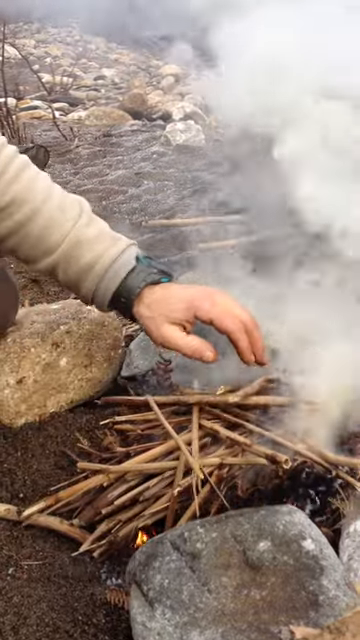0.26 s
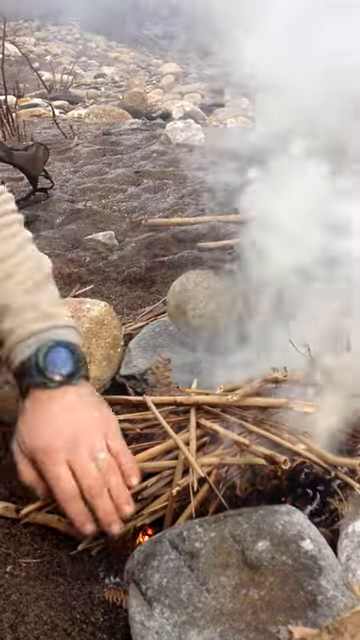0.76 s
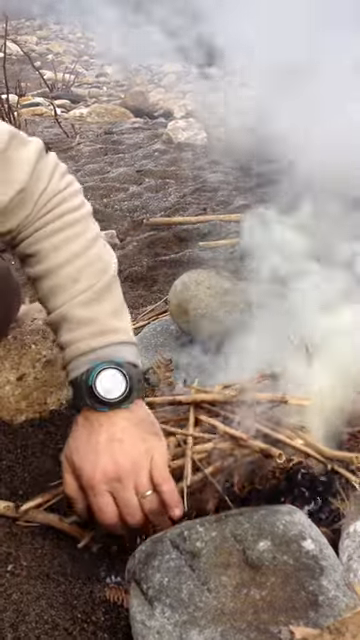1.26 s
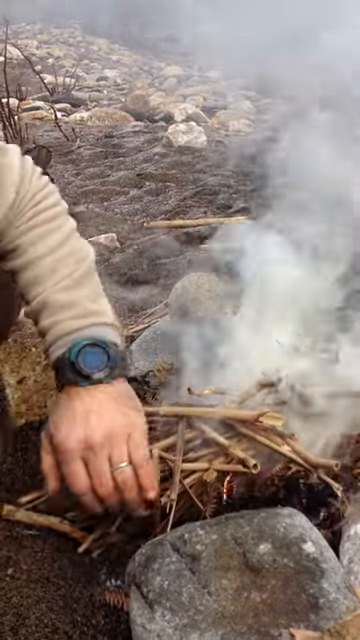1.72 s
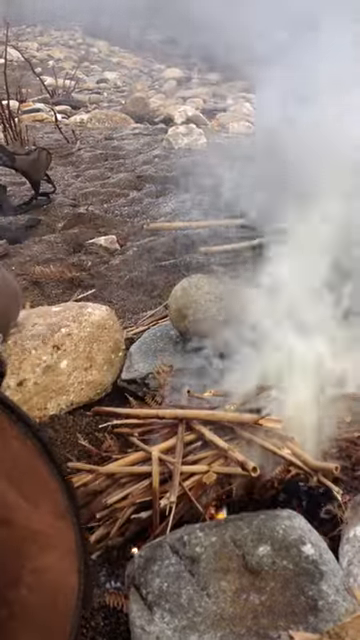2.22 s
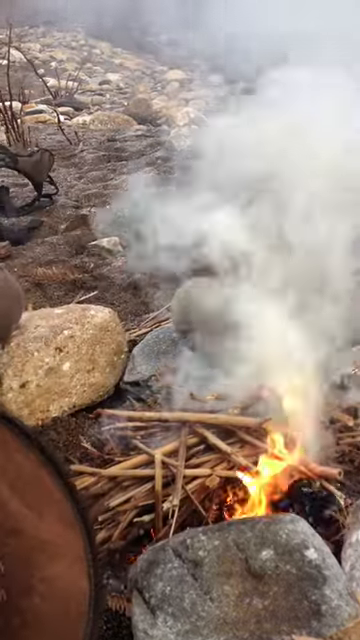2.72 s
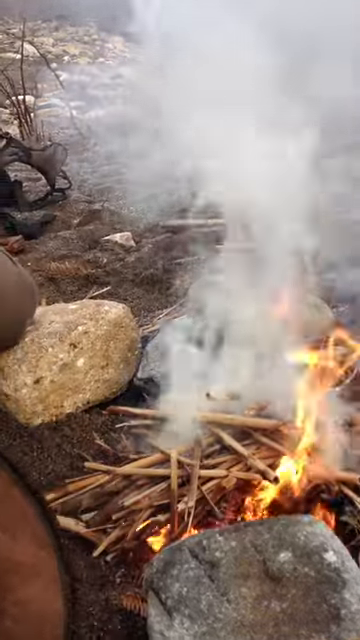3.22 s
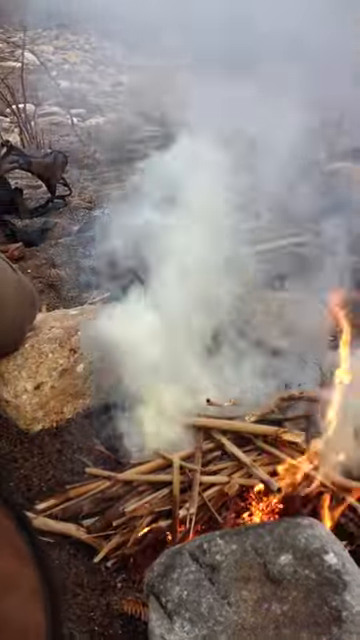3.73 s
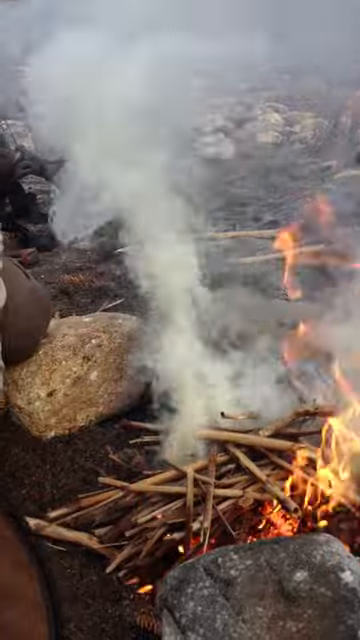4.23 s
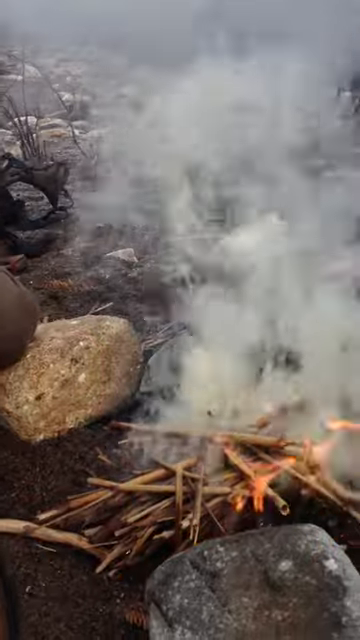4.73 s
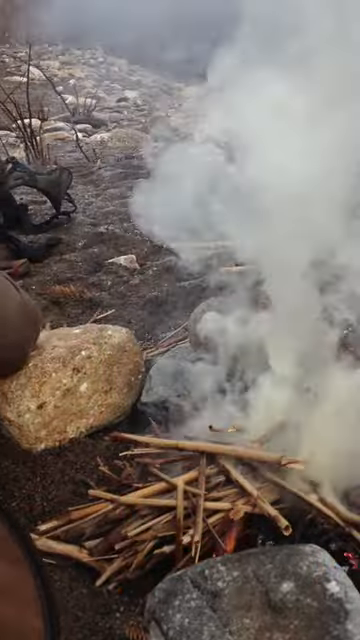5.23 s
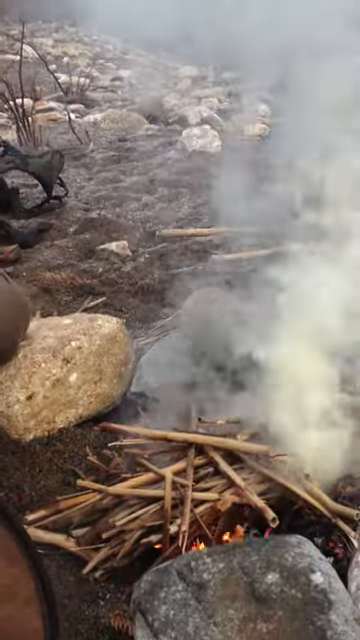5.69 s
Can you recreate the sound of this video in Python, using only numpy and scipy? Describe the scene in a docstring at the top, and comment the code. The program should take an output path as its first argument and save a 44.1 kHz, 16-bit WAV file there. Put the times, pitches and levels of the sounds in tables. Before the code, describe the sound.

Thin stems tick, fizz and snap close to the microphone while a river rushes softly behind. A violent crack bursts out early and the level ducks slightly, then recovers. Midway the fire catches, with puffing low flutter, thick crackles, another hard pop and sizzling steam. It dies back abruptly to light ticking, a splintery burst near five seconds and a last cluster of small cracks. Open air, only faint scatter from stones.

```python
"""Small stem fire on a river bank

Damp plant stems hiss and fizz (filtered clicks), fibres snap (single sharp breaks with splintering tails)
and a few hollow stems burst and ring (cracks plus decaying modes). A flame flutters softly (low filtered
noise) and flares up half-way through. Behind it a river rushes steadily (noise, bubbles, fine drops).
The stones add a faint scatter. Loud pops make the recorder's gain duck, and it creeps back afterwards."""
import sys
import numpy as np
from scipy import signal
from scipy.fft import rfft, irfft, next_fast_len
from scipy.io import wavfile

SR = 44100
rng = np.random.default_rng(int(sys.argv[2]) if len(sys.argv) > 2 else 0)


def wav_out(sig):
    """Save sig, one row per channel (or a flat mono array), as 16-bit PCM at SR to the path in sys.argv[1]."""
    wavfile.write(sys.argv[1], SR, np.round(np.clip(np.atleast_2d(sig).T, -1, 1) * 32767).astype(np.int16))


N = 262611
TIME = np.arange(N) / SR
SHORT = TIME[:2048]  # time axis of one brief sound


def undb(db):
    """Decibels to gain."""
    return 10 ** (np.asarray(db) / 20)


def curve(table):
    """A (time, level) table joined by straight lines in time."""
    times, levels = np.transpose(table)
    return np.interp(TIME, times, levels)


def unit(x):
    """Scale to rms 1."""
    return x / np.sqrt(np.mean(x ** 2))


def colour(x, points):
    """Causal minimum-phase filter through (Hz, dB) points, joined along log frequency."""
    hz, db = np.transpose(points)
    size = 2 * next_fast_len(len(x) // 2 + 1)
    bins = np.maximum(np.arange(size // 2 + 1) * SR / size, 1)
    gain_db = np.interp(np.log(bins), np.log(hz), db)
    cepstrum = irfft(np.log(undb(gain_db)))
    # folding the cepstrum forward in time makes the filter causal
    cepstrum[1:size // 2] *= 2
    cepstrum[size // 2 + 1:] = 0
    response = np.exp(rfft(cepstrum))
    return irfft(rfft(x, size) * response)[:len(x)]


def no_bass(x, hz):
    """Steep high-pass: so small a source radiates no deep bass."""
    return signal.sosfilt(signal.butter(4, hz, "highpass", fs=SR, output="sos"), x)


def walk(rate):
    """Random wander with a spread near 1, drawn at rate points a second and joined by lines."""
    return 1.2 * np.interp(TIME * rate, np.arange(2048), rng.standard_normal(2048))


def add(out, s, sound):
    """Mix a sound in at a time in seconds."""
    start = int(s * SR)
    out[start:start + len(sound)] += sound[:N - start]


def decay(t60):
    """Exponential fall that loses 60 dB in t60 seconds."""
    return np.exp(-np.log(1000) * SHORT / t60)


def ring(hz, t60):
    """A struck mode; the pressure jumps at the blow and swings away."""
    return np.cos(2 * np.pi * hz * SHORT) * decay(t60)


def fracture(tail_share, tail_t60):
    """One sharp break, then a brief splintering; the two share an energy near 1."""
    share = np.clip(tail_share, 0, 1)
    tail = rng.standard_normal(len(SHORT)) * decay(tail_t60)
    pulse = np.sqrt(share) * tail / np.linalg.norm(tail)
    pulse[0] = np.sqrt(1 - share)
    return pulse


def grains(per_s, spread_db):
    """Random tiny clicks of either sign, many weak and few strong."""
    chance, size, sign = rng.random((3, N))
    strength = np.minimum(-np.log(1 - size), np.pi)
    happens = chance < per_s / SR
    return happens * undb(spread_db * strength) * np.sign(sign - .5)


def pores(clicks, low_hz, high_hz, t60):
    """Each click rings a pore of its own size, so every tick has its own pitch."""
    out = np.zeros(N)
    for at in np.flatnonzero(clicks):
        hz = low_hz * (high_hz / low_hz) ** rng.random()
        tick = ring(hz, t60)
        add(out, at / SR, clicks[at] * tick / np.linalg.norm(tick))
    return out


def bubbles(count, low_hz, high_hz, cycles, spread_db):
    """Air folded into running water rings briefly; small bubbles are quieter; rms 1."""
    out = np.zeros(N)
    for when, size, strength in rng.random((count, 3)):
        hz = low_hz * (high_hz / low_hz) ** size
        level = undb(spread_db * strength) * np.sqrt(low_hz / hz)
        add(out, when * N / SR, level * ring(hz, cycles / hz))
    return unit(no_bass(out, 400))


def river():
    """Water over stones: a low rush that wavers, bubbling, and finer splashing above it."""
    # tone of the low rush: (frequency [Hz], gain [dB])
    rush_tone = [(18, -51.5), (30, -48), (86, -22.5), (106, -15.5), (137, -4.5), (187, 0), (266, -2),
                 (303, -3), (365, -4), (393, -3), (423, -4), (636, -2.5), (871, -8), (1190, -7),
                 (2500, -15), (3250, -27.5), (5500, -120)]
    # tone of the splashing drops: (frequency [Hz], gain [dB])
    splash_tone = [(1400, -11.5), (2300, 3), (3000, 3.5), (3800, 0), (4550, 1.5), (5000, -7), (7500, -5.5),
                   (9700, -20), (15000, -13.5)]
    # drift of the splashing treble: (time [s], level [dB])
    splash_level = [(0, -59.5), (1.5, -58.5), (2.2, -60), (4.55, -61.5), (4.9, -57.5), (5.03, -62.5),
                    (5.22, -64), (5.31, -59), (5.95, -59)]
    rush = unit(colour(rng.standard_normal(N), rush_tone)) * undb(0.83 * walk(rate=18))
    babble = bubbles(count=2200, low_hz=531.2, high_hz=3640, cycles=8.85, spread_db=20)
    drops = unit(grains(per_s=7000, spread_db=0.5))
    splash = unit(colour(drops, splash_tone)) * undb(0.86 * walk(rate=29))
    return rush * undb(-51) + babble * undb(-61.5) + splash * undb(curve(splash_level))


def flame():
    """Burning gas flutters in the draught: faint over the embers, strong in each flare."""
    # tone of the flutter: (frequency [Hz], gain [dB])
    flutter_tone = [(25, -35), (60, -32), (100, -12.5), (150, -1.5), (200, 1), (290, -4.5), (400, -12),
                    (700, -31), (1500, -42.5)]
    # height of the flame, which catches, flares and collapses: (time [s], flutter level before wavering [dB])
    flame_level = [(0, -71), (2.36, -67), (2.54, -52), (2.62, -60.5), (2.75, -52.5), (2.92, -51.5),
                   (3.0, -47), (3.13, -47.5), (3.21, -47), (3.44, -49), (3.53, -53), (3.71, -53.5),
                   (3.79, -47), (4.03, -52), (4.13, -49.5), (4.31, -47.5), (4.39, -68.5), (5.95, -60)]
    roar = unit(colour(rng.standard_normal(N), flutter_tone))
    return roar * undb(curve(flame_level) + 1.68 * walk(rate=42))


def swell(start, attack_s, end, release_s):
    """An even rise, a hold until the end, then a dying away."""
    rise = np.clip((TIME - start) / attack_s, 0, 1)
    return rise * np.exp(-np.maximum(TIME - end, 0) / release_s)


def boiling():
    """Flow of steam: a slow boil with short spurts on top."""
    # how hard the sap boils, rising as the flame takes hold: (time [s], relative level [dB])
    boil_level = [(0, -71.5), (1.0, -68.5), (1.35, -66), (1.6, -62), (2.0, -68.5), (2.62, -71.5),
                  (2.9, -67), (3.05, -60.5), (3.5, -55), (3.85, -58.5), (4.38, -58), (4.6, -64),
                  (5.1, -65.5), (5.95, -71)]
    # spurts of steam: (start [s], length [s], relative level [dB])
    spurt_list = [(1.13, 0.078, -64.5), (1.379, 0.1, -62.5), (3.275, 0.035, -60), (5.27, 0.061, -57.5)]
    attack_s, release_s = 0.0143, 0.033
    spurts = np.zeros(N)
    for start, length, db in spurt_list:
        spurts += undb(db) * swell(start, attack_s, start + length, release_s)
    return np.hypot(undb(curve(boil_level)), spurts)


def steam(boil):
    """Sap boils out of the stems: a sputtering hiss, ticks that quicken with it, and a bright sizzle."""
    # tone of the escaping steam: (frequency [Hz], gain [dB])
    hiss_tone = [(2000, -22), (4300, -2), (5000, -9.5), (6300, -5), (7900, -2), (9000, -5), (9900, -10),
                 (12000, -7.5), (15000, -15.5)]
    # tone of the fine sizzle where the flame licks the damp stems: (frequency [Hz], gain [dB])
    sizzle_tone = [(3000, -29), (6000, -15), (8000, -5), (10000, -14), (12000, -12), (15000, -4.5)]
    jet = unit(colour(grains(per_s=4500, spread_db=4.0), hiss_tone)) * undb(2.7 * walk(rate=45))
    tick_rate = 90 * (boil / boil.mean()) ** .5
    ticks = colour(grains(per_s=tick_rate, spread_db=4.5), hiss_tone)
    heat = boil / boil.max()
    # blisters are both rarer and weaker away from the height of the boil
    blisters = grains(per_s=420 * heat, spread_db=5.0) * np.sqrt(heat)
    sizzle = colour(pores(blisters, low_hz=6020, high_hz=14020, t60=0.0023), sizzle_tone)
    return boil * jet * undb(-3.5) + ticks * undb(-40.5) + sizzle * undb(-44)


def stones(x, t60, wet_db):
    """Faint, quick scatter from the ground and the stones around the fire."""
    late = SHORT > .002  # the first scatter arrives after 2 ms
    scatter = rng.standard_normal(len(SHORT)) * decay(t60) * late
    scatter /= np.linalg.norm(scatter)
    return x + undb(wet_db) * signal.fftconvolve(x, scatter)[:N]


def snaps():
    """Fibres break in the heat; thick ones have more body, thin and splintering ones more air."""
    # the snapping fibres: (time [s], relative level [dB], body near 3 kHz re level [dB],
    # share of energy in the splintering tail [0-1])
    snap_list = [(0.1875, -29.5, -14, 0.26), (0.271, -34.5, -9, 0), (0.33, -19, -4.5, 0),
                 (0.554, -25.5, -20.5, 0.46), (0.6981, -14.5, -5.5, 0.16), (0.7255, -32.5, -7.5, 0.36),
                 (0.924, -17, -8, 0.17), (1.0545, -28, -11.5, 0.24), (1.1433, -25.5, -15, 0.12),
                 (1.1556, -31, -7, 0.49), (1.2177, -26.5, 1.5, 0.3), (1.2722, -30.5, -10, 0.54),
                 (1.2939, -29.5, -18.5, 0.32), (1.444, -29.5, 3, 0.24), (1.5507, -31.5, -12, 0.33),
                 (1.6387, -27, -14, 0.07), (1.892, -26, -4, 0.28), (1.9115, -26, -9, 0.24),
                 (1.9504, -28.5, -9, 0.14), (2.5859, -28, -23.5, 0.43), (2.6991, -28, -14.5, 0.42),
                 (2.7226, -18.5, -21.5, 0.04), (2.773, -20, -4, 0.43), (2.9514, -27.5, -9, 0),
                 (2.9795, -15.5, -9.5, 0.42), (3.0184, -23, -10, 0), (3.06, -2.5, -11, 0.31),
                 (3.067, -25.5, -9.5, 0.2), (3.0848, -26, 1.5, .5), (3.13, -10, -8, 0.11),
                 (3.1497, -29, -5.5, 0.1), (3.1759, -30.5, -11.5, .4), (3.1894, -26, -10.5, 0.33),
                 (3.199, -26.5, -13, 0.28), (3.2961, -30, -15, 0.34), (3.3036, -20.5, -15, 0.28),
                 (3.3121, -24, -11, 0.58), (3.323, -17, 1.5, 0.62), (3.377, -23, -2, 0.26),
                 (3.4015, -14.5, -7.5, 0.2), (3.49, -29, -3, .45), (3.5043, -31, -0.5, 0.52),
                 (3.51, -26, -9, 0.2), (3.5923, -32, -9, 0.33), (3.6035, -26.5, -10, 0.17),
                 (3.6653, -25.5, -6, 0.1), (3.6995, -24, -12.5, 0.27), (3.7176, -30.5, -12.5, .15),
                 (3.7526, -24, -3, 0.15), (3.8737, -29, -9.5, 0.18), (3.9482, -26.5, -13.5, 0.02),
                 (3.9689, -28, -10, 0), (4.037, -38, -10.5, 0.08), (4.152, -23.5, -14, 0.22),
                 (4.2998, -31, -11.5, 0.51), (4.347, -27.5, -11, 0.42), (4.3715, -32, -11.5, 0.53),
                 (4.5244, -29, -2.5, 0.3), (4.5898, -21, 7.5, 0.17), (4.6075, -25, -1.5, 0.3),
                 (4.6227, -26, -5.5, 0.29), (4.6974, -37, -5.5, .4), (4.755, -32, -9.5, 0.42),
                 (4.9685, -23, -7.5, 0.19), (4.9848, -31, -12, 0.29), (5.0549, -35, -13.5, 0.33),
                 (5.0877, -35.5, -2.5, 0.45), (5.2522, -27, -14, 0.17), (5.362, -32.5, -9, .35),
                 (5.375, -22.5, -8.5, 0.17), (5.3899, -30, -11.5, 0.48), (5.4211, -29.5, -7.5, 0.42),
                 (5.491, -32, -10, 0.28), (5.5739, -29.5, -8, 0.1), (5.605, -31, -9, 0.24),
                 (5.8063, -26, 6, 0.18), (5.8996, -19.5, -11, 0.45)]
    # tone common to all snaps: (frequency [Hz], gain [dB])
    snap_tone = [(150, 0.5), (1000, 2.5), (3000, 0), (4400, 3.5), (4950, -1.5), (5700, 0.5), (7700, 5),
                 (9200, 1.5), (10100, 1.5), (12000, 5.5), (15000, 0)]
    out = np.zeros(N)
    for s, db, body_db, tail_share in snap_list:
        # loud, thick fibres are duller; splintering adds air
        air_db = -16.5 - 0.1178 * db + 23.5 * tail_share
        wood_db = 1.5 + 1.5 * body_db  # the woody low part follows the body
        thickness = [(1200, wood_db), (3200, body_db), (6200, 0), (8300, 0), (11000, air_db)]
        pulse = fracture(tail_share, tail_t60=.007)
        add(out, s, undb(db) * colour(pulse, thickness))
    return colour(no_bass(out, 250), snap_tone) * undb(1.5)


def bursts():
    """Steam splits hollow stems: cracks, the ringing of their walls and a thump in the pile."""
    # cracks and wall rings of the bursting stems; rows close together are several modes of one burst:
    # (time [s], crack level [dB], share of energy in the splintering tail [0-1],
    # tail t60 [s], ring frequency [Hz], ring t60 [s], ring level [dB], thump of escaping gas [dB])
    mode_list = [(1.603, 8, 0.14, 0.0058, 4385, 0.0071, -13.5, -24.5),
                 (1.6034, -26, .2, .005, 6310, 0.0067, -16.5, -70),
                 (1.7378, -39.5, .2, .005, 8290, 0.0196, -42.5, -80),
                 (1.739, -38, 0.3, .005, 6300, 0.025, -48.5, -83),
                 (3.0602, -9, 0.1, .008, 4243, 0.00323, -20.5, -72.5),
                 (4.9075, -34, .5, .008, 4590, 0.0058, -36, -74.5),
                 (4.9377, -18.5, 0.65, .008, 11320, 0.0051, -34, -68.5),
                 (4.9395, -13, 0.76, 0.0257, 4180, 0.00295, -24, -66.5),
                 (4.94, -11, 0.48, .009, 7065, 0.0094, -24.5, -68.5),
                 (4.9406, -25.5, .7, .01, 8580, .006, -33, -76),
                 (5.7561, -19.5, 0.39, .006, 8230, 0.0045, -34.5, -73),
                 (5.8502, -13.5, 0.7, 0.0092, 2576, 0.00445, -23, -65),
                 (5.8538, -18.5, 0.68, .009, 3000, 0.00415, -28, -76),
                 (5.8588, -20.5, 0.62, 0.0092, 2500, 0.0046, -34, -68)]
    # tone of the crack: (frequency [Hz], gain [dB])
    crack_tone = [(100, -15), (300, -12), (1000, -13), (1800, -8.5), (2200, -8.5), (2850, -10.5), (3400, 0),
                  (4400, 1.5), (5000, -2), (6300, -6), (7900, -3), (9400, -10.5), (10400, -20),
                  (12000, -15.5), (13500, -31.5), (15000, -30)]
    # modes of the gap under the pile, rung by a burst: (frequency [Hz], t60 [s], relative level [dB])
    hollow_modes = [(200.3, 0.0364, -2), (304, 0.0068, -5.5), (735, 0.0174, -1), (1426, 0.0143, -1.5)]
    wall_rise_s = 0.00009  # the wall takes a moment to swing up as the split runs along it
    out = np.zeros(N)
    thump = sum(undb(db) * ring(hz, t60) for hz, t60, db in hollow_modes)
    for s, crack_db, tail_share, tail_t60, hz, t60, ring_db, thump_db in mode_list:
        crack = colour(fracture(tail_share, tail_t60), crack_tone)
        wall = ring(hz, t60) * (1 - np.exp(-SHORT / wall_rise_s))
        add(out, s, undb(crack_db) * crack + undb(ring_db) * wall + undb(thump_db) * thump)
    return no_bass(out, 135)


def scene():
    """The fire close by, the river behind."""
    crackle = stones(bursts() + snaps(), t60=0.0145, wet_db=-18)
    return (crackle + steam(boiling()) + flame() + river())[None]


def gain_control(x):
    """A loud pop pushes the gain down; it creeps back afterwards."""
    threshold_db, slope = -17.5, 0.162  # slope: dB of cut per dB above the threshold
    attack_s, release_s = 0.0244, 0.936
    over_db = np.maximum(20 * np.log10(np.abs(x) + 1e-9) - threshold_db, 0)
    # hold each peak while it decays along the recovery
    recovery = np.exp(-TIME / release_s)
    held_db = np.maximum.accumulate(over_db / recovery, axis=-1) * recovery
    lag = np.exp(-1 / (attack_s * SR))
    cut_db = slope * signal.lfilter([1 - lag], [1, -lag], held_db)
    return x * undb(-cut_db)


def record(dry):
    """The recorder ducks after loud pops and cuts the top steeply above 15.15 kHz."""
    top_cut = signal.ellip(8, .2, 70, 15150, fs=SR, output="sos")
    return signal.sosfilt(top_cut, gain_control(dry))


dry = scene()
out = record(dry)
wav_out(out)
```